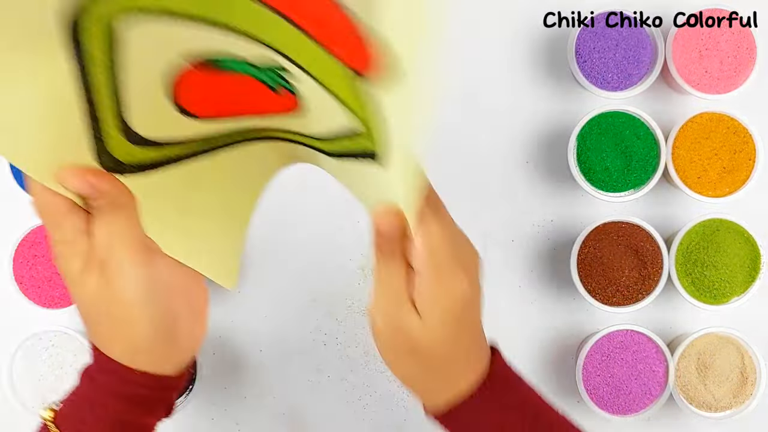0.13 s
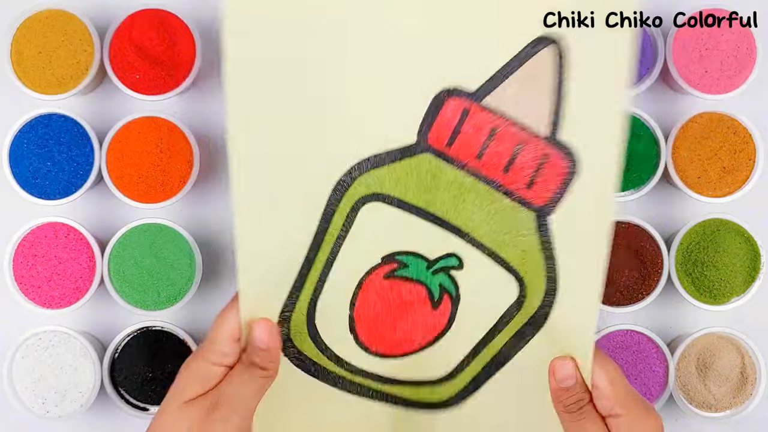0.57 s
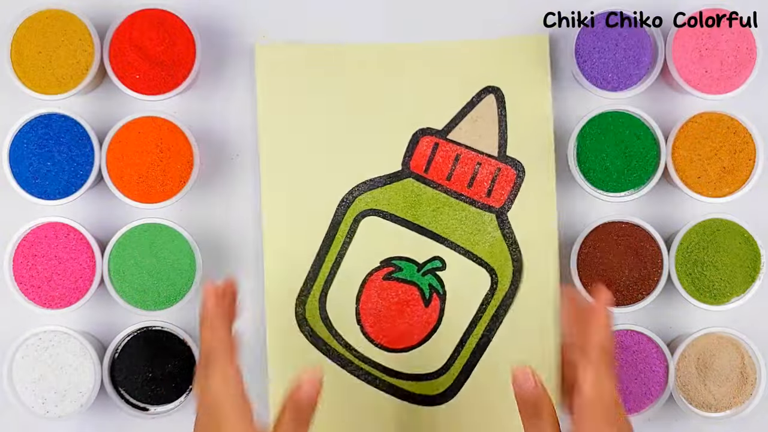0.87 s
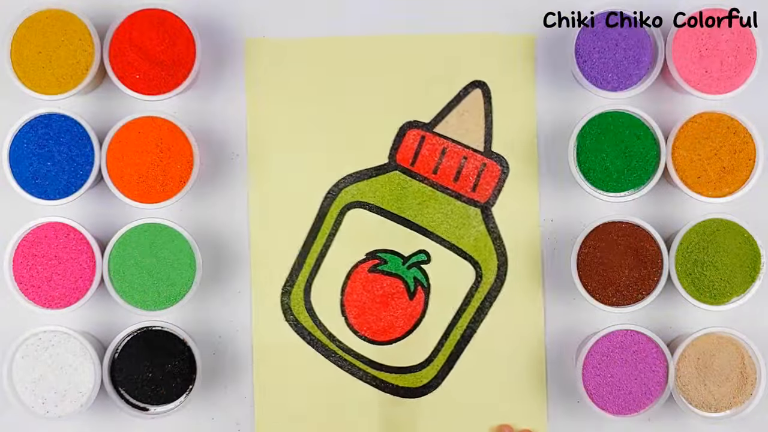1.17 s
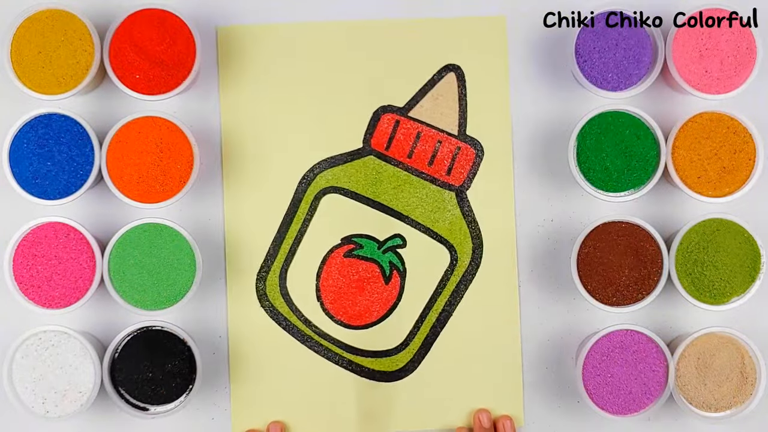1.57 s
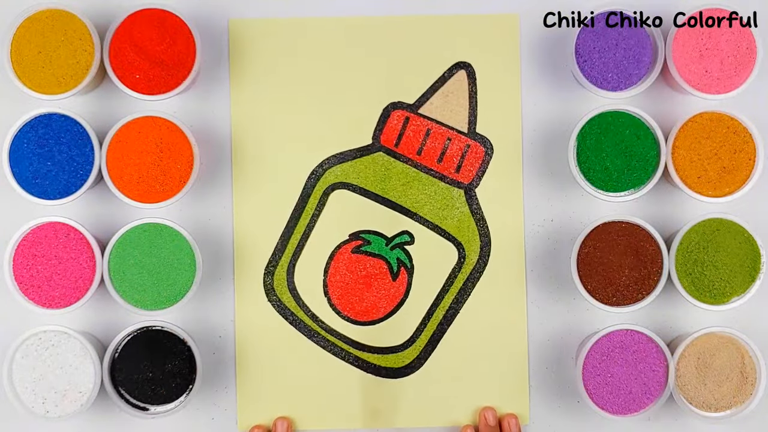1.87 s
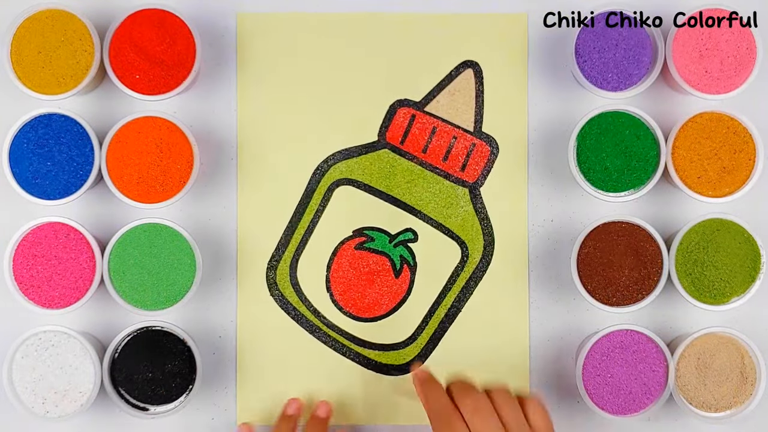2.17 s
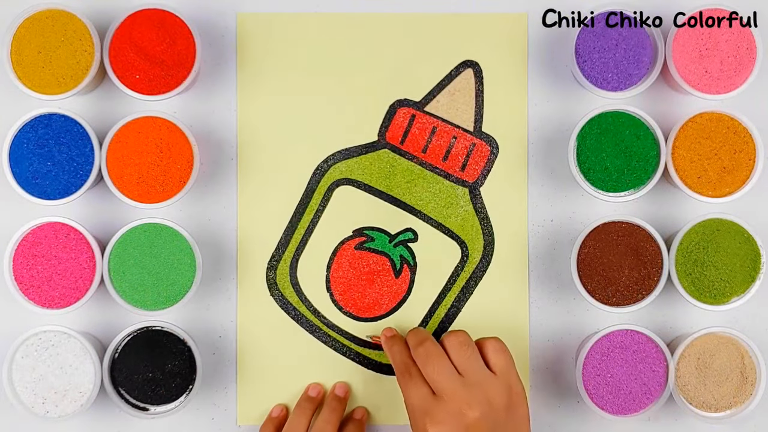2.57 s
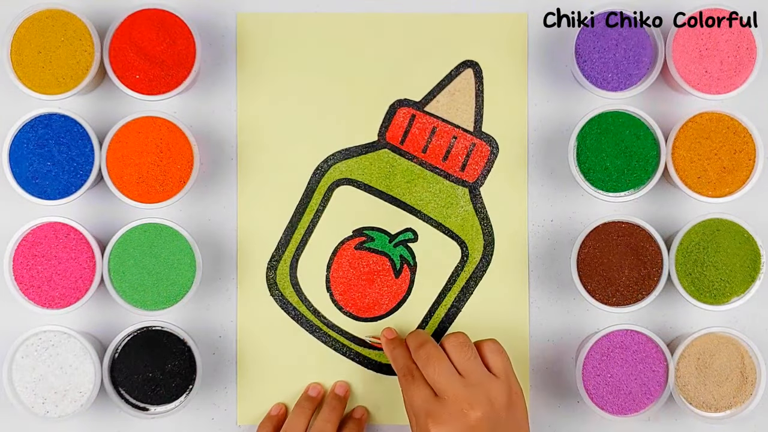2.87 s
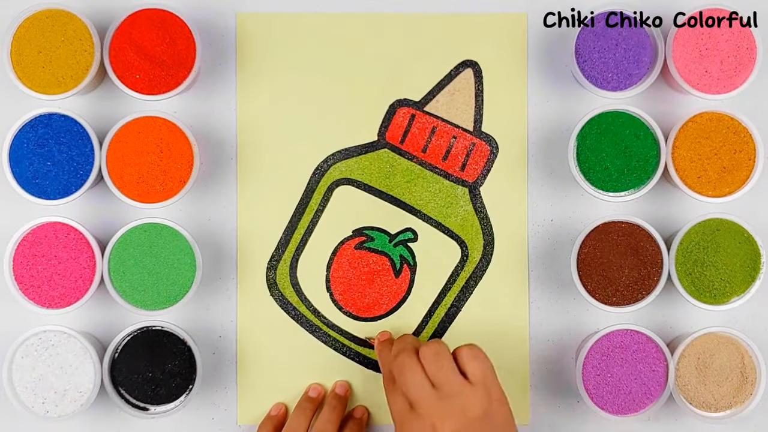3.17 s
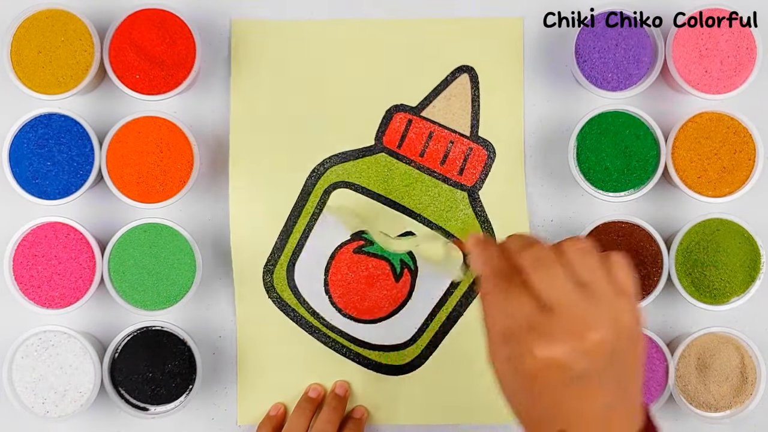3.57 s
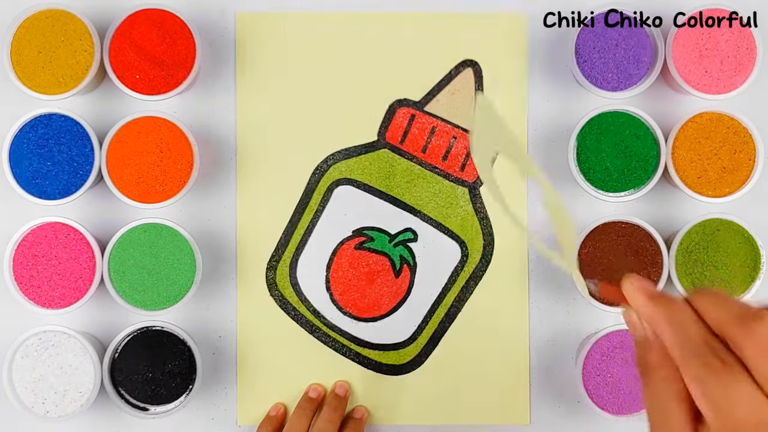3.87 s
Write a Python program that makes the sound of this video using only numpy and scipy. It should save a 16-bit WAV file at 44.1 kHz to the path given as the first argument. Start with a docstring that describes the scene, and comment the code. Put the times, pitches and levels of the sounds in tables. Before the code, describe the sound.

A stiff paper sheet is shaken, slid across a table, then its film is peeled off sharply

```python
"""Close, identical in both channels: hands shake a stiff paper sheet, whose low-mid wobble, rough whaps, snaps and
scrapes are coloured noise, short modes, ringing clicks and gliding noise bands. From 1.1 s it slides over a table,
a drag and a hiss of tiny catches; at 2 s the level dips briefly. Then it creaks under soft knocks and a brushing
nail, and from 3.3 s a film tears off it with loud snaps. Rumble, faint machine hums and room noise lie beneath."""
import sys
import numpy as np
from scipy import signal
from scipy.fft import rfft, irfft
from scipy.io import wavfile
from scipy.ndimage import uniform_filter1d

SR = 44100
rng = np.random.default_rng(int(sys.argv[2]) if len(sys.argv) > 2 else 0)


def wrap_up_sound(samples):
    """Save the sound to the file named by the first command line argument, as 16-bit audio."""
    columns = np.atleast_2d(samples).T
    # keep every value between -1 and 1, then stretch to whole-number steps
    tamed = np.clip(columns, -1, 1)
    steps = np.round(tamed * 32767).astype(np.int16)
    wavfile.write(sys.argv[1], SR, steps)


N = 176400
T = np.arange(N) / SR  # s

# Bright colour of paper fizz and nail brushing: frequency_hz, relative_level_db (per Hz)
BRUSH_COLOUR = [(2060, -7), (3500, 0.5), (5010, -0.5), (7270, 3.5), (9040, -4), (11400, 0), (15400, 1.5)]


def undb(db):
    """Turn decibels into an amplitude factor."""
    return 10 ** (np.asarray(db) / 20)


def coloured(x, points):
    """Filter to a curve of (Hz, dB) points, falling steeply outside them, and scale to rms 1."""
    hz, db = np.array(points).T
    log_hz = np.log(hz)
    log_f = np.log(np.maximum(np.fft.rfftfreq(N, 1 / SR), 1))
    below = np.maximum(log_hz[0] - log_f, 0)
    above = np.maximum(log_f - log_hz[-1], 0)
    gain_db = np.interp(log_f, log_hz, db) - 120 * (below + above)
    y = irfft(rfft(x) * undb(gain_db), N)
    return y / np.std(y)


def walk(rate):
    """Draw random levels, hold each for 1 / rate s and slew between them."""
    hold = int(SR / rate)
    steps = np.repeat(rng.standard_normal(N // hold + 1), hold)
    return uniform_filter1d(steps, hold)[:N]


def rub(table, axis, colour, grit_db, density, flicker_db):
    """Stick-slip friction: tiny catches (density per s) of uneven size over a hiss, on a level curve."""
    rows = np.array(table)
    caught = rng.random(N) < density / SR
    size = undb(grit_db * rng.exponential(size=N)) * rng.standard_normal(N)
    catches = np.clip(caught * size, -8, 8)
    friction = coloured(rng.standard_normal(N) + catches, colour)
    flicker = undb(flicker_db * walk(130))
    level_db = np.interp(T, rows[:, 0], rows[:, axis], left=-120, right=-120)
    return friction * flicker * undb(level_db)


def add(out, s, x):
    """Mix a short sound in at s seconds, cut off at the end."""
    i = int(s * SR)
    out[i:i + len(x)] += x[:N - i]


def shake():
    """The shaken sheet wobbles in the low mids while its surface rustles and fizzes."""
    # Levels before the flicker: time_s, wobble_db, rustle_db, fizz_db
    levels = [(0.0, -34.5, -43.5, -49), (0.12, -39.5, -50.5, -53), (0.232, -32, -48, -51.5),
              (0.242, -34, -34, -50), (0.358, -33.5, -49, -51.5), (0.374, -32.5, -45, -48.5),
              (0.536, -38, -65, -52.5), (0.554, -41.5, -47, -48), (0.654, -51, -69, -65.5),
              (0.676, -44.5, -55.5, -59.5), (0.77, -58, -62, -61), (0.786, -50.5, -49, -46.5),
              (0.86, -53.5, -46.5, -51), (0.915, -47, -42, -44.5), (0.972, -48, -55, -63),
              (0.998, -52, -54.5, -51), (1.044, -59, -62, -69), (1.12, -55, -65, -74)]
    # Colours: frequency_hz, relative_level_db (per Hz)
    wobble_colour = [(59, -37), (100, -2.5), (389, 1.5), (551, -5), (733, -2), (1900, -22.5), (2860, -58),
                     (4840, -120)]
    rustle_colour = [(880, -4.5), (1500, -1.5), (1920, -7), (2930, -7), (5500, -13.5), (7150, -31),
                     (12100, -120)]
    wobble = rub(levels, axis=1, colour=wobble_colour, grit_db=10, density=150, flicker_db=2.5)
    rustle = rub(levels, axis=2, colour=rustle_colour, grit_db=12, density=500, flicker_db=2.5)
    fizz = rub(levels, axis=3, colour=BRUSH_COLOUR, grit_db=21, density=620, flicker_db=3.5)
    return wobble + rustle + fizz


def rumble():
    """The table carries an uneven rumble of very low noise."""
    # Level before the flicker: time_s, level_db
    levels = [(0.0, -47), (0.04, -38.5), (0.4, -37.5), (0.69, -56), (0.91, -43.5), (1.05, -60),
              (1.18, -51.5), (2.55, -59), (2.63, -44), (2.71, -52), (2.93, -56.5), (3.0, -37),
              (3.22, -55.5), (3.72, -44.5), (3.75, -40.5), (4.0, -44)]
    # Colour: frequency_hz, relative_level_db (per Hz)
    colour = [(8.8, -60), (15, 4.5), (32, 0.5), (49, -2), (100, -1.5), (130, -20), (220, -120)]
    return rub(levels, axis=1, colour=colour, grit_db=-25.0, density=160, flicker_db=-4.5)


def hums():
    """Faint machine tones in the room waver because each is a narrow band of noise."""
    # Tones: pitch_hz, width_hz (flat top), level_db
    tones = [(92.4, 6.2, -55), (1617, 21, -76.5)]
    out = np.zeros(N)
    for hz, w, db in tones:
        band = [(hz - 3 * w, -50), (hz - w / 2, 0), (hz + w / 2, 0), (hz + 3 * w, -50)]
        out += undb(db) * coloured(rng.standard_normal(N), band)
    return out


def room():
    """Steady room noise, heaviest in the bass."""
    # Colour: frequency_hz, relative_level_db (per Hz)
    colour = [(12, -25), (20, -1), (39, -1), (58, -28), (96, -2), (172, -7.5), (459, -18.5), (607, -20),
              (759, -28), (1660, -26.5), (16000, -35.5)]
    return undb(-57) * coloured(rng.standard_normal(N), colour)


def flaps():
    """The sheet buckles with a rough whap: a few short, detuned modes under a dull rattle."""
    # Whaps: start_s, peak_db, pitch_hz, rattle_db (against the unscaled modes)
    whaps = [(0.031, -28.5, 888, -3), (0.061, -17.5, 632, 8), (0.128, -25.5, 690, 7), (0.146, -20, 733, 12),
             (0.159, -26, 280, 2), (0.197, -15, 384, -0.5), (0.244, -19, 253, 0.5), (0.267, -30, 244, -14),
             (0.311, -24, 373, 11), (0.323, -22, 420, 13), (0.373, -16.5, 249, -6.5), (0.388, -17, 417, -2),
             (0.462, -19.5, 363, 2), (0.487, -31, 784, -13), (0.555, -22, 853, -7.5),
             (0.569, -30, 776, -13), (0.787, -35, 287, 21), (0.876, -34, 1420, -4), (0.891, -33, 210, -22),
             (0.934, -33, 229, -13), (2.959, -38.5, 205, -16), (2.981, -36, 194, -8),
             (2.999, -35.5, 291, -4), (3.034, -38, 266, 1), (3.617, -23, 198, 5), (3.721, -24, 274, 2),
             (3.751, -23, 922, -14), (3.848, -20.5, 1180, -10)]
    # Modes: multiple_of_pitch, level_db (before the dulling of high modes)
    modes = [(.55, -8), (1, 2.5), (1.6, -6), (2.3, -9), (3.4, 3)]
    t60_s, attack_s = 0.063, 0.00053
    dull_hz, detune = 1220, 0.0613  # detune: typical random shift as a share of the mode's pitch
    out, t = np.zeros(N), T[:6000]
    chance = rng.standard_normal((len(whaps), 2, len(t)))
    rattle_band = signal.butter(3, [150, 1150], "band", fs=SR)
    envelope = undb(-60 * t / t60_s) * (1 - np.exp(-t / attack_s))
    for (s, db, hz, rattle_db), (noise, shift) in zip(whaps, chance):
        x = np.zeros(len(t))
        for k, (multiple, mode_db) in enumerate(modes):
            mode_hz = hz * multiple
            gain = undb(mode_db) / (1 + (mode_hz / dull_hz) ** 4)
            x += gain * np.sin(2 * np.pi * mode_hz * (1 + detune * shift[k]) * t)
        rattle = signal.lfilter(*rattle_band, noise)
        x = (x + undb(rattle_db) * rattle / np.std(rattle)) * envelope
        add(out, s, x / np.abs(x).max() * undb(db))
    return out


def knocks():
    """Finger pads and sheet press softly on the table: a few cycles swell and fade, blurred by rough contact."""
    # Pushes: centre_s, peak_db, pitch_hz, half_length_s
    pushes = [(0.065, -20, 115, 0.0042), (0.384, -25, 69.6, 0.018), (0.795, -34.5, 148, 0.0058),
              (0.894, -35, 129, 0.0082), (2.024, -39.5, 228, 0.048), (2.033, -33, 644, 0.013),
              (2.03, -30, 430, 0.0093), (2.056, -31, 380, 0.0081), (2.602, -22.5, 128, 0.0036),
              (2.623, -31, 45.6, 0.0072), (2.782, -34, 203, 0.013), (2.984, -23, 171, 0.0019),
              (3.001, -21, 94, 0.0047), (3.027, -30, 50.7, 0.018), (3.541, -32.5, 397, 0.011),
              (3.623, -30.5, 214, 0.005), (3.762, -28, 71, 0.017)]
    # Modes: multiple_of_pitch, relative_level_db
    modes = [(1.002, 14.5), (2.3, -6)]
    blur_db, blur_from, blur_to = 1.5, 1.08, 1.95  # dB; band edges as multiples of the pitch
    out, t = np.zeros(N), T[:3528] - T[1764]  # time zero is the centre of the push
    noise = rng.standard_normal((len(pushes), len(t)))
    for (s, db, hz, half), n in zip(pushes, noise):
        x = np.zeros(len(t))
        for multiple, mode_db in modes:
            swell = np.exp(-multiple ** .5 * (t / half) ** 2)
            x += undb(mode_db) * np.cos(2 * np.pi * hz * multiple * t) * swell
        band = signal.butter(2, [blur_from * hz, blur_to * hz], "band", fs=SR)
        blur = signal.lfilter(*band, n)
        x = x + undb(blur_db) * blur / np.std(blur) * np.exp(-(t / (1.32 * half)) ** 2)
        add(out, s + t[0], x / np.abs(x).max() * undb(db))
    return out


def snaps():
    """Creases and glue snap: a click rings one broad resonance over a wide crack, then leaves a faint hiss."""
    # Clicks: start_s, peak_db, pitch_hz
    clicks = [(0.0632, -28, 2800), (0.1, -24, 2900), (0.1278, -27.5, 5000), (0.159, -28.5, 2860),
              (0.375, -28.5, 2830), (0.5546, -33.5, 3460), (0.5672, -26.5, 8000), (0.79, -28.5, 3220),
              (0.877, -32, 2300), (0.894, -22, 4180), (0.992, -33.5, 6200), (1.1758, -36, 7100),
              (1.505, -33, 7130), (1.516, -31, 7340), (1.6486, -26, 6960), (1.654, -32, 6440),
              (1.669, -31, 6610), (1.6758, -25, 6650), (1.7325, -24.5, 6950), (1.7476, -23.5, 6600),
              (1.7834, -44, 7180), (1.7926, -30, 5960), (1.819, -34, 6500), (1.8414, -30, 8220),
              (1.8502, -26, 6700), (2.0952, -29.5, 12800), (2.601, -40.5, 9000), (2.6489, -39.5, 6450),
              (2.77, -36, 12500), (2.774, -39, 6500), (2.792, -39, 5500), (2.802, -41, 12500),
              (2.8185, -35.5, 12300), (2.884, -43, 12500), (2.9608, -39, 6750), (3.019, -46, 7380),
              (3.0317, -21, 7160), (3.102, -37, 7470), (3.259, -20.5, 6100), (3.29, -29, 12000),
              (3.3376, -10.5, 2970), (3.3418, -13, 7400), (3.3433, -25, 2900), (3.366, -19, 12000),
              (3.37, -27, 7000), (3.554, -24.5, 12500), (3.561, -26, 7000), (3.5872, -17, 10800),
              (3.608, -18, 12400), (3.616, -22, 12000), (3.6743, -10.5, 12400), (3.6955, -18, 13000),
              (3.7325, -11, 8600), (3.7824, -17.5, 3560), (3.9056, -33, 3400), (3.921, -30, 3100),
              (3.9664, -51, 2720)]
    t60_s, tail_t60_s, tail_db = .005, .025, -18
    wide, rough, crack_db = .5, .4, -6  # share of pitch; noise against the click; dB against the ring
    out, t = np.zeros(N), T[:2500]
    noise = rng.standard_normal((len(clicks), len(t)))
    decay = undb(-60 * t / t60_s) + undb(tail_db - 60 * t / tail_t60_s)
    for (s, db, hz), n in zip(clicks, noise):
        edges = [hz * (1 - wide / 2), min(hz * (1 + wide), .45 * SR)]
        band = signal.butter(2, edges, "band", fs=SR)
        push = decay * (rough * n + (t == 0))
        ring = signal.lfilter(*band, push)
        crack = np.diff(push, prepend=0)
        x = ring / np.abs(ring).max() + undb(crack_db) * crack / np.abs(crack).max()
        add(out, s, x / np.abs(x).max() * undb(db))
    return out


def scrapes():
    """Paper edges scrape past each other: short swells of rough noise around a gliding pitch."""
    # Strokes: start_s, length_s, level_db (before the swell), start_hz, end_hz, width (share of start pitch)
    strokes = [(.225, 0.043, -30.5, 5550, 4400, 0.16), (0.077, 0.033, -41.5, 2310, 3640, 0.23),
               (.135, 0.039, -40.5, 2463, 2860, 0.13), (0.871, 0.013, -38, 2100, 2090, 0.26),
               (0.906, 0.043, -45.5, 2900, 3070, 0.1), (3.295, .05, -39, 3300, 2700, .1),
               (3.339, 0.013, -26.5, 2980, 2830, 0.053), (3.344, 0.15, -43.5, 2855, 2575, 0.16),
               (3.835, .055, -27.5, 1100, 1248, 0.31), (3.838, 0.046, -33, 2237, 2415, 0.37),
               (3.893, 0.088, -41.5, 1115, 1081, 0.15)]
    out = np.zeros(N)
    noise = rng.standard_normal((len(strokes), 2, 9000))
    for (s, length, db, from_hz, to_hz, wide), n in zip(strokes, noise):
        u = np.linspace(0, 1, int(length * SR))
        phase = 2 * np.pi * np.cumsum(from_hz + (to_hz - from_hz) * u) / SR
        # Two slow noises on a cosine and a sine make a noise band that follows the glide
        slow = signal.lfilter(*signal.butter(2, wide * from_hz, fs=SR), n)
        a, b = slow[:, -len(u):]
        x = a * np.cos(phase) + b * np.sin(phase)
        add(out, s, x / np.std(x) * np.sin(np.pi * u) * undb(db))
    return out


def slide():
    """The flat sheet slides: friction drags through the table and hisses along the paper."""
    # Levels before the flicker: time_s, drag_db, hiss_db
    levels = [(1.12, -65, -73), (1.132, -56, -70), (1.174, -50.5, -41.5), (1.312, -42.5, -34.5),
              (1.408, -51, -41), (1.482, -56.5, -57), (1.518, -50.5, -42), (1.644, -51.5, -41),
              (1.672, -46, -36.5), (1.718, -54.5, -55.5), (1.734, -51, -45.5), (1.77, -52.5, -48.5),
              (1.882, -55.5, -46.5), (1.896, -62, -58.5), (1.912, -55.5, -47), (1.952, -54.5, -50),
              (1.99, -57, -68)]
    # Colours: frequency_hz, relative_level_db (per Hz)
    drag_colour = [(71, -18), (120, 2.5), (237, -8.5), (387, -7), (2600, -19), (3380, -20), (5720, -120)]
    hiss_colour = [(1410, -53), (2400, -23.5), (3030, -12), (3830, -4.5), (5060, -6.5), (6910, 1),
                   (9890, -10.5), (13300, -6.5), (15400, -11)]
    drag = rub(levels, axis=1, colour=drag_colour, grit_db=4.5, density=250, flicker_db=0.5)
    hiss = rub(levels, axis=2, colour=hiss_colour, grit_db=7.5, density=1200, flicker_db=2.5)
    return drag + hiss


def dip(x):
    """The whole level dips briefly near 2 s, with quick fades either side."""
    start_s, end_s, fade_s, dip_db = 1.988, 2.011, 0.0012, -23
    times = [start_s - fade_s, start_s, end_s - fade_s, end_s]
    return x * undb(np.interp(T, times, [0, dip_db, dip_db, 0]))


def pick():
    """The sheet creaks low while a nail brushes it, both dense stick-slip."""
    # Levels before the flicker: time_s, creak_db, brush_db
    levels = [(2.01, -47, -60), (2.03, -46, -51.5), (2.07, -51, -61.5), (2.156, -60, -66),
              (2.378, -63, -68.5), (2.468, -58.5, -59.5), (2.504, -63.5, -69), (2.816, -56.5, -60.5),
              (2.876, -63, -71), (2.882, -53, -57.5), (2.918, -61, -68), (3.016, -51, -62),
              (3.034, -40.5, -46), (3.046, -49.5, -61), (3.076, -49.5, -49.5), (3.116, -50, -61),
              (3.138, -51.5, -48), (3.166, -52.5, -51), (3.196, -62, -63), (3.242, -61, -72),
              (3.262, -54, -53), (3.27, -51, -52)]
    # Colour: frequency_hz, relative_level_db (per Hz)
    creak_colour = [(71, -66), (120, -14.5), (203, -12.5), (568, -18), (2400, -34.5), (3120, -72),
                    (5280, -120)]
    creak = rub(levels, axis=1, colour=creak_colour, grit_db=0.5, density=1500, flicker_db=2.5)
    brush = rub(levels, axis=2, colour=BRUSH_COLOUR, grit_db=2, density=1500, flicker_db=1.5)
    return creak + brush


def peel():
    """The lifted sheet wobbles as the film tears free in a bright crackle."""
    # Levels before the flicker: time_s, wobble_db, tear_db
    levels = [(3.27, -61, -55), (3.288, -66, -53), (3.318, -54, -33), (3.334, -48, -41),
              (3.345, -45.5, -37), (3.514, -51.5, -46.5), (3.565, -45.5, -42), (3.612, -50, -43.5),
              (3.618, -29, -29.5), (3.628, -41, -44), (3.7, -38, -33), (3.726, -47, -25),
              (3.74, -41.5, -28.5), (3.764, -31.5, -24.5), (3.79, -40.5, -42), (3.9, -32.5, -49),
              (3.904, -38, -42), (3.94, -38.5, -53), (3.956, -42.5, -50), (3.984, -43, -60.5),
              (4.0, -51, -56)]
    # Colours: frequency_hz, relative_level_db (per Hz)
    wobble_colour = [(59, -28), (100, -3.5), (296, -1), (478, -4), (1120, -4), (2200, -13.5), (2860, -19.5),
                     (4840, -120)]
    tear_colour = [(1060, -8), (1800, -3.5), (2870, -5.5), (3760, 2.5), (4920, -4), (6740, 1.5),
                   (9480, -4.5), (12000, -0.5), (15400, -4)]
    wobble = rub(levels, axis=1, colour=wobble_colour, grit_db=19, density=520, flicker_db=1.0)
    tear = rub(levels, axis=2, colour=tear_colour, grit_db=6, density=500, flicker_db=2.5)
    return wobble + tear


def scene():
    """Mix all layers, dip the level and send the same signal to both channels."""
    background = rumble() + hums() + room()
    rubbing = shake() + slide() + pick() + peel()
    hits = flaps() + knocks() + snaps() + scrapes()
    x = dip(background + rubbing + hits)
    return np.array([x, x])


def record(dry):
    """The recorder cuts the top steeply above 15750 Hz."""
    top_cut = signal.ellip(10, .2, 70, 15750, fs=SR, output="sos")
    return signal.sosfilt(top_cut, dry)


dry = scene()
out = record(dry)
wrap_up_sound(out)
```